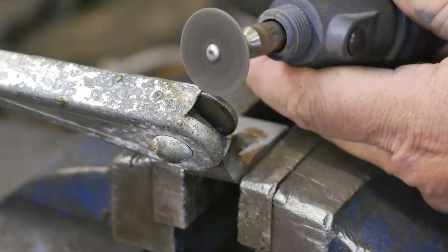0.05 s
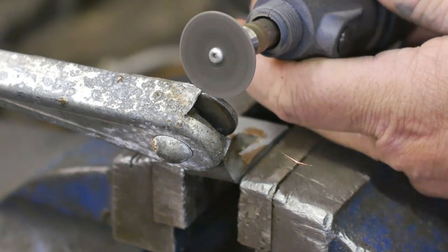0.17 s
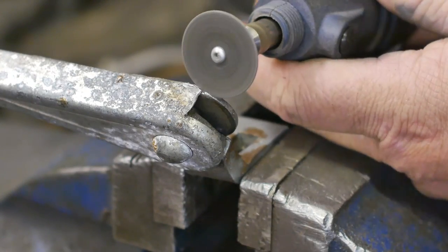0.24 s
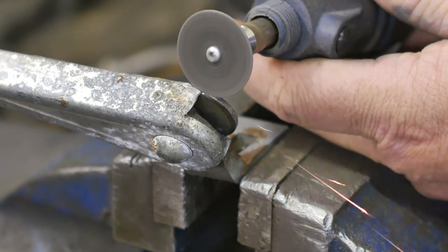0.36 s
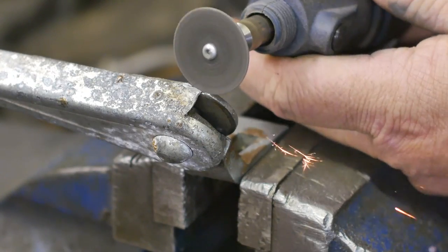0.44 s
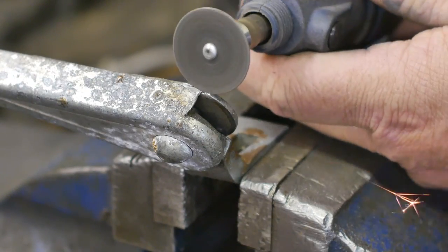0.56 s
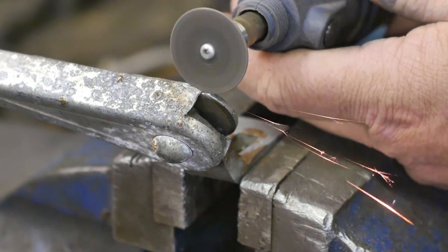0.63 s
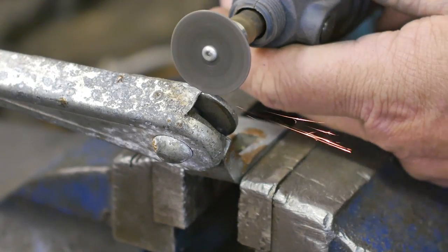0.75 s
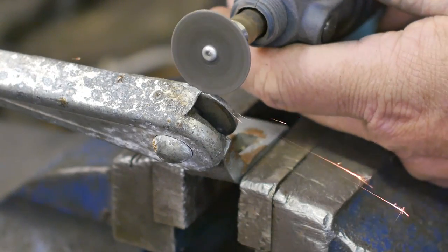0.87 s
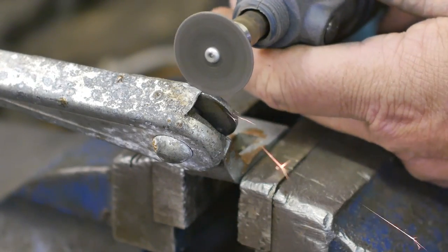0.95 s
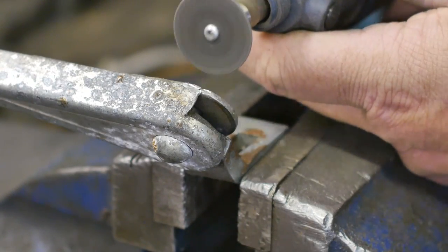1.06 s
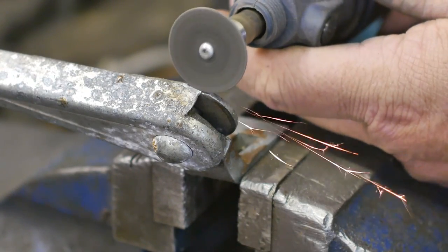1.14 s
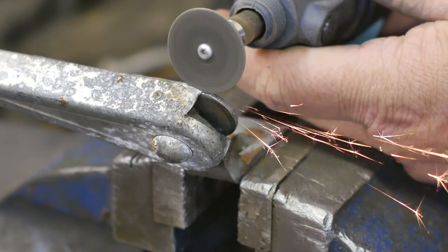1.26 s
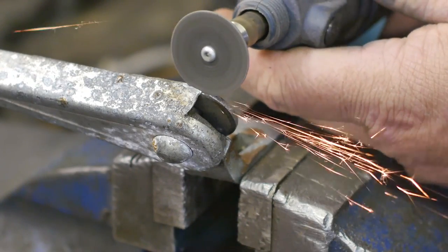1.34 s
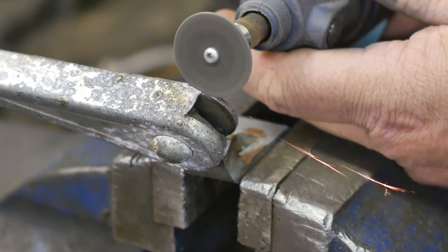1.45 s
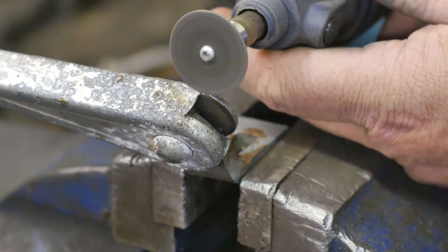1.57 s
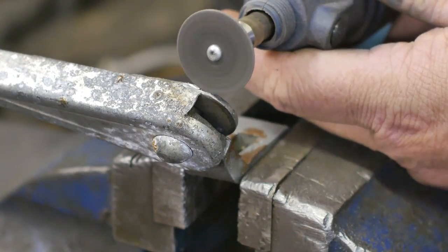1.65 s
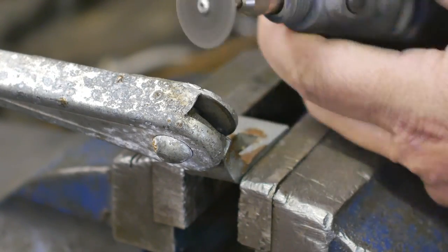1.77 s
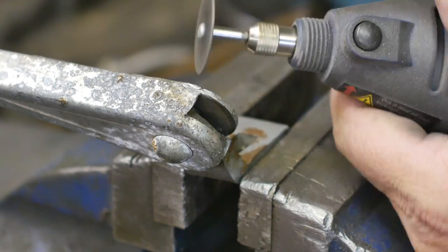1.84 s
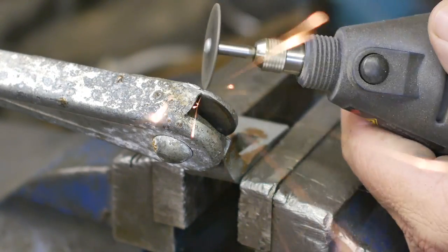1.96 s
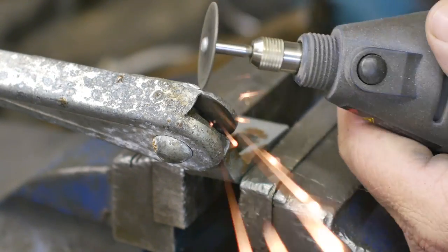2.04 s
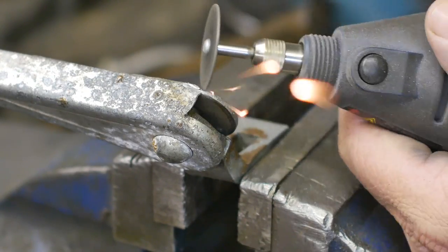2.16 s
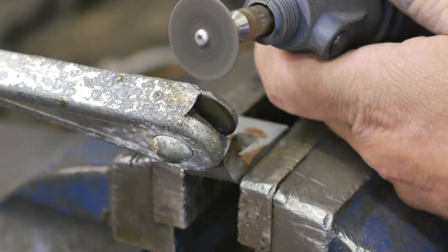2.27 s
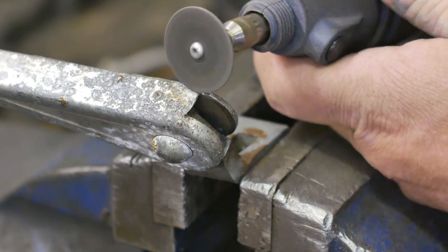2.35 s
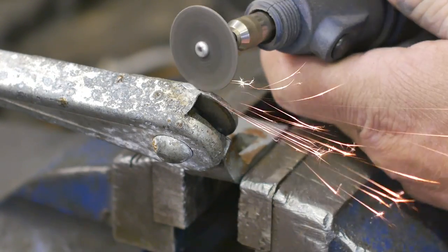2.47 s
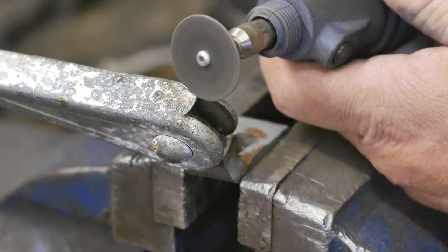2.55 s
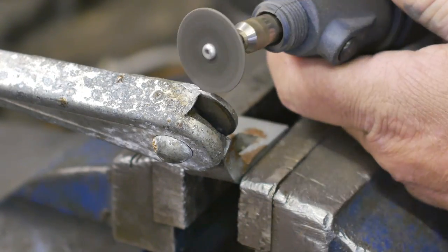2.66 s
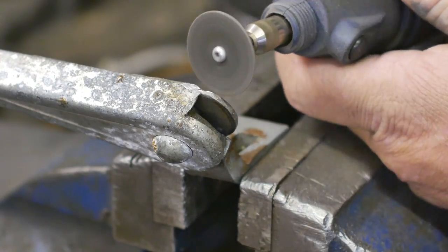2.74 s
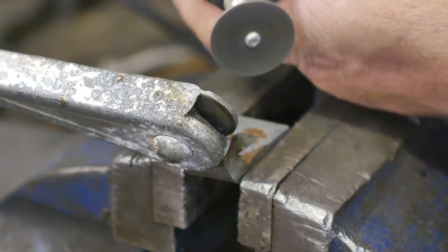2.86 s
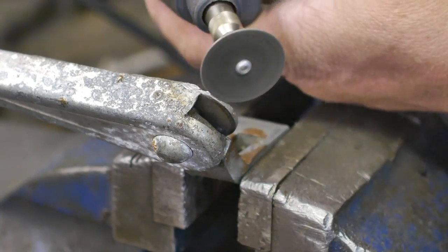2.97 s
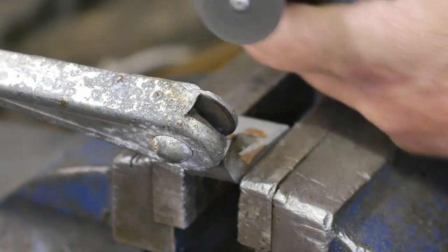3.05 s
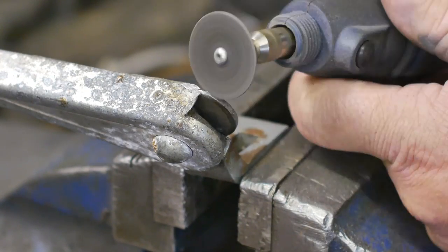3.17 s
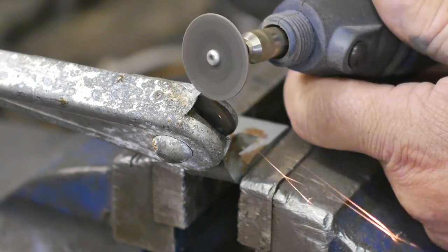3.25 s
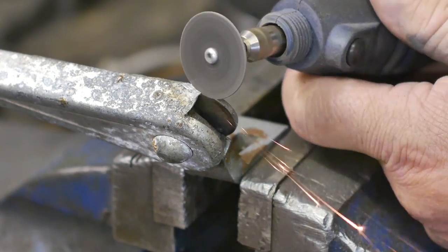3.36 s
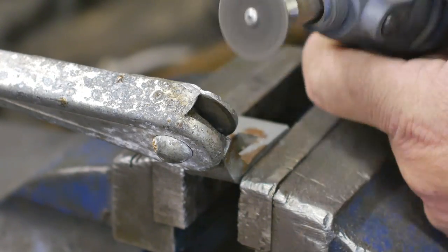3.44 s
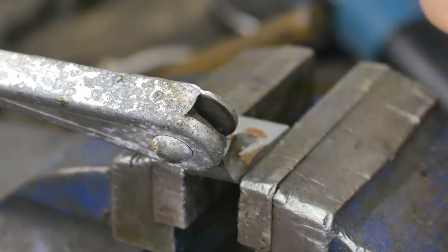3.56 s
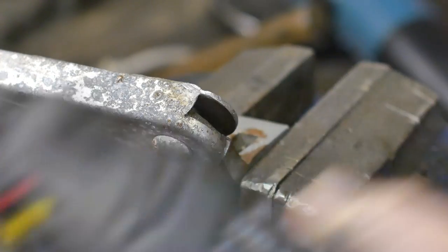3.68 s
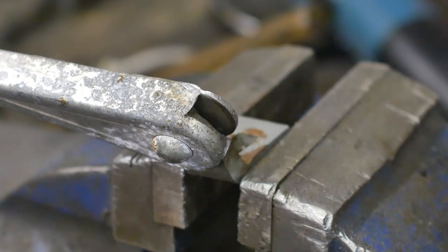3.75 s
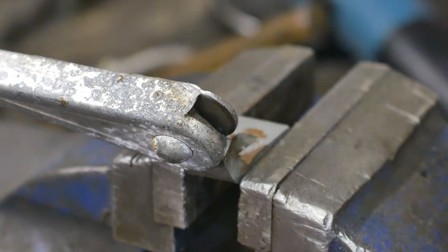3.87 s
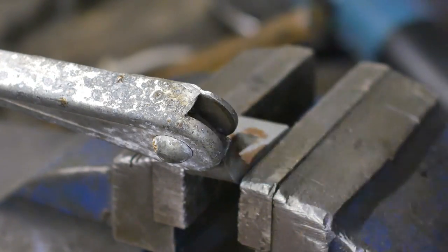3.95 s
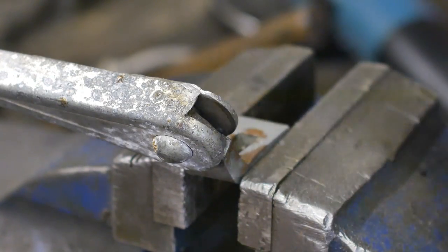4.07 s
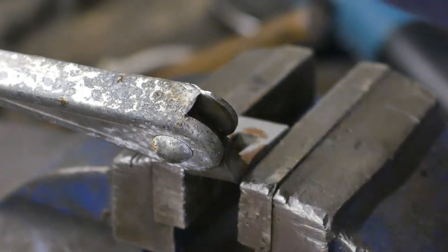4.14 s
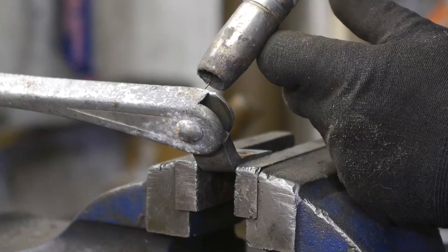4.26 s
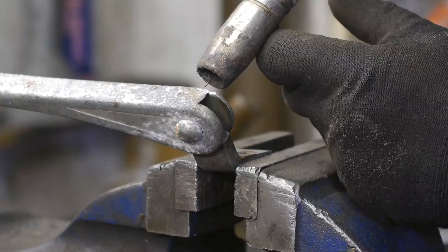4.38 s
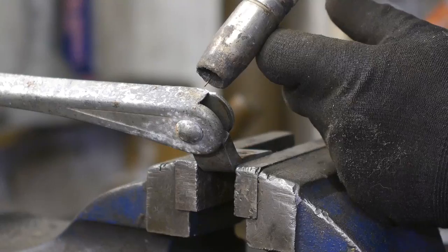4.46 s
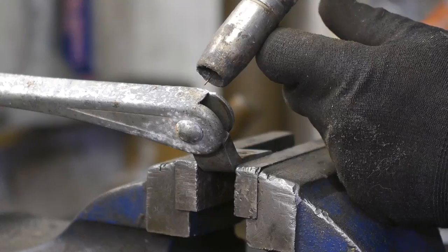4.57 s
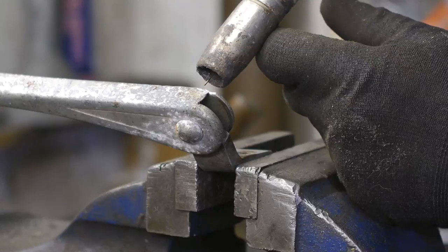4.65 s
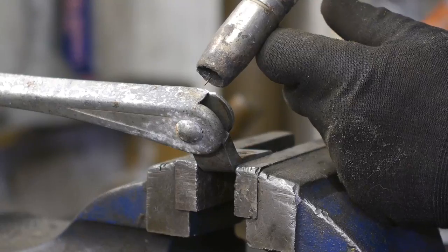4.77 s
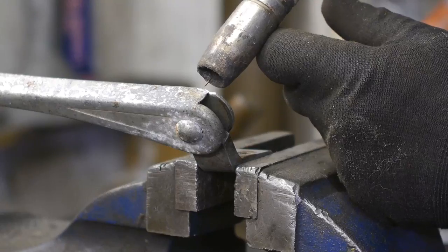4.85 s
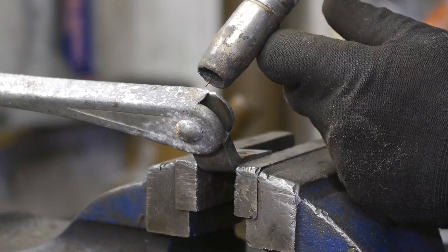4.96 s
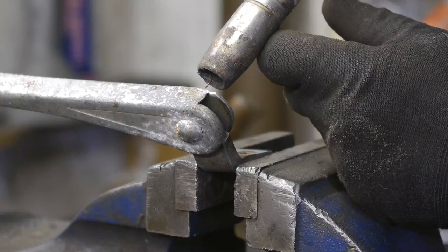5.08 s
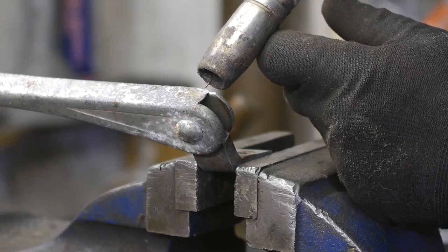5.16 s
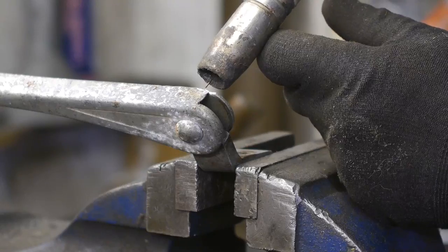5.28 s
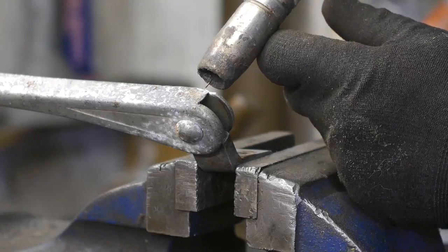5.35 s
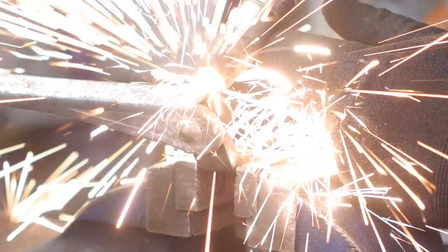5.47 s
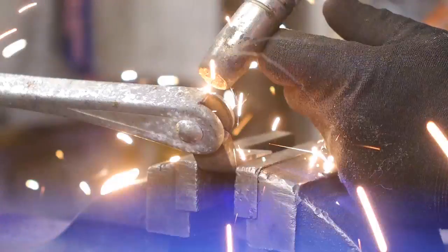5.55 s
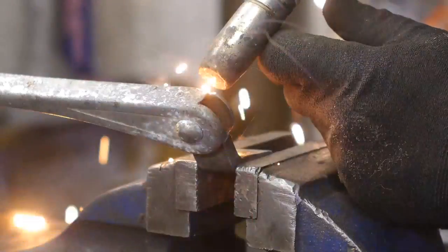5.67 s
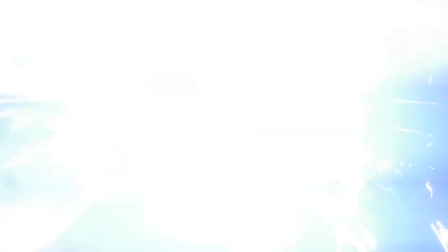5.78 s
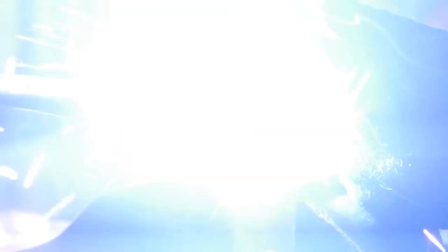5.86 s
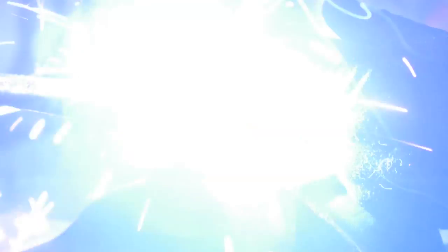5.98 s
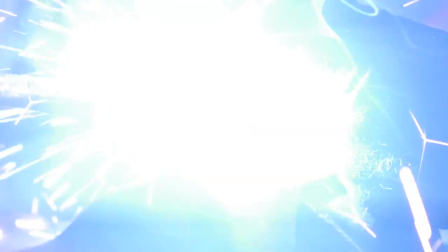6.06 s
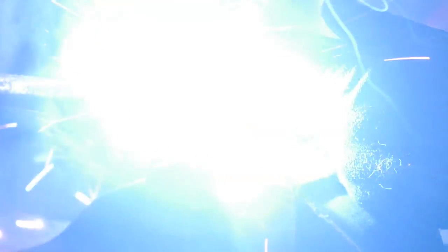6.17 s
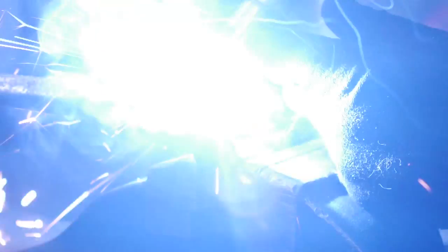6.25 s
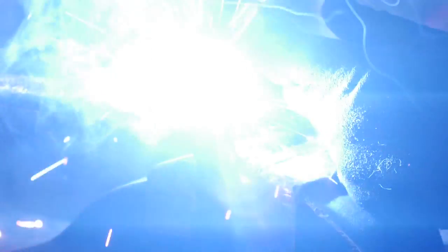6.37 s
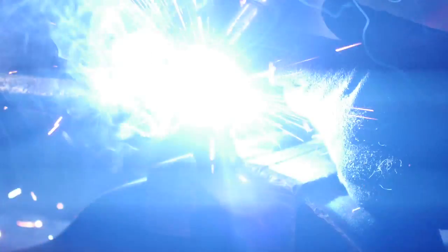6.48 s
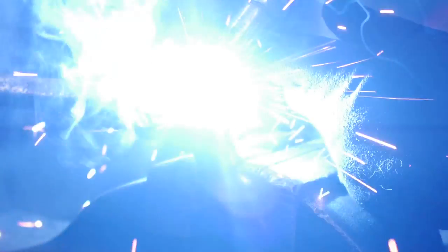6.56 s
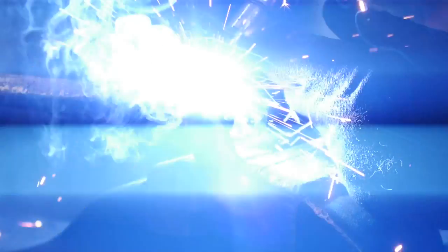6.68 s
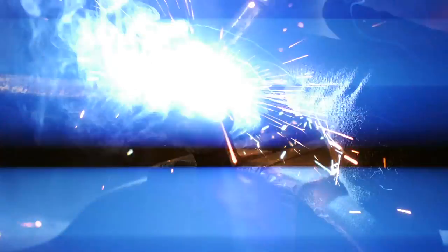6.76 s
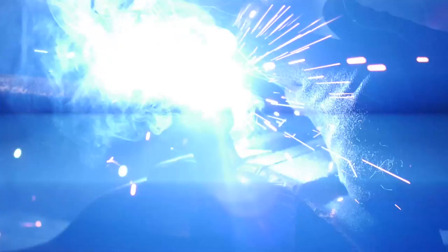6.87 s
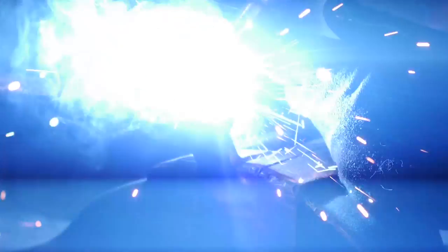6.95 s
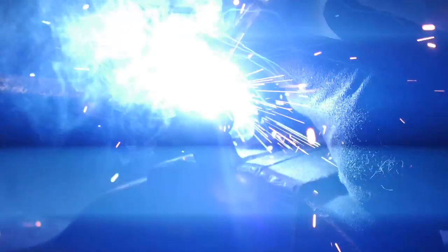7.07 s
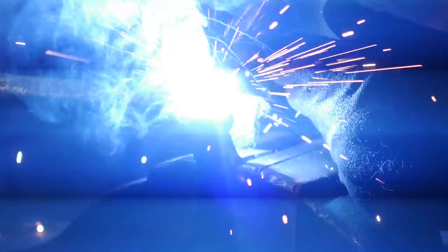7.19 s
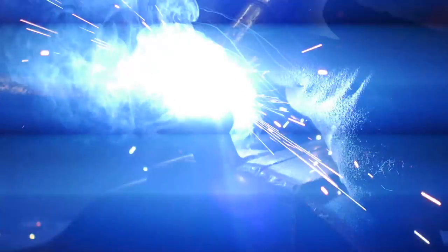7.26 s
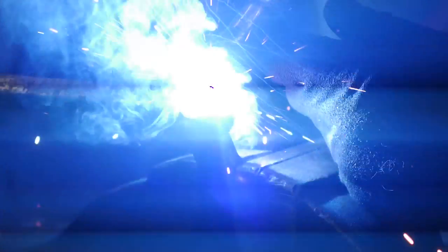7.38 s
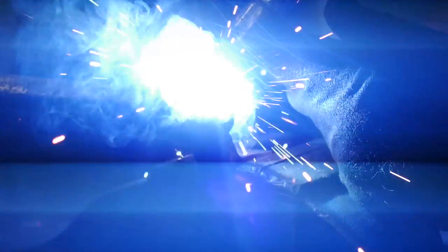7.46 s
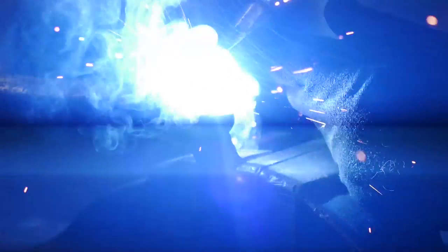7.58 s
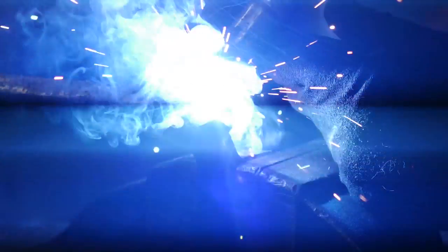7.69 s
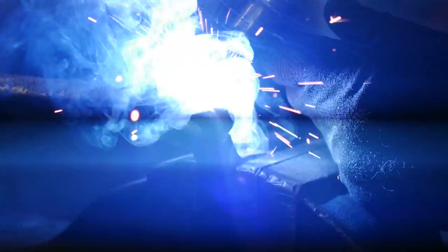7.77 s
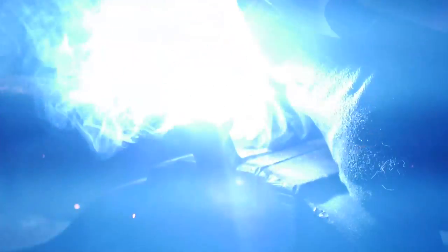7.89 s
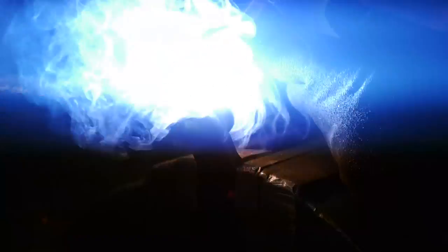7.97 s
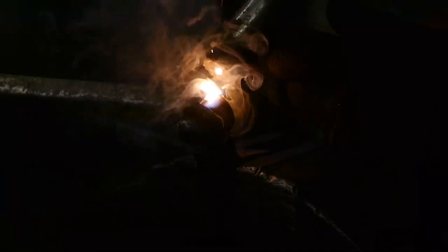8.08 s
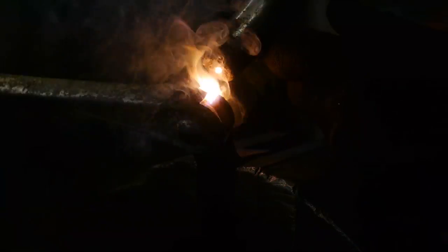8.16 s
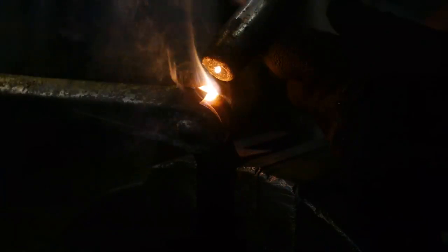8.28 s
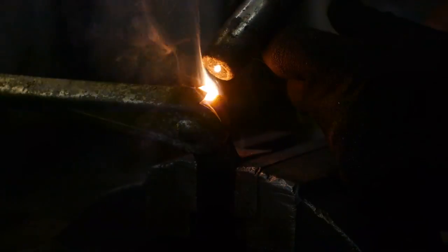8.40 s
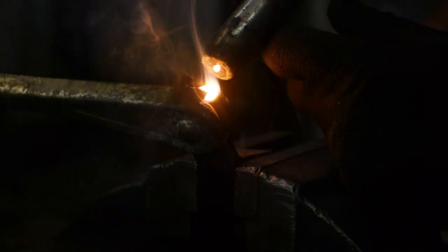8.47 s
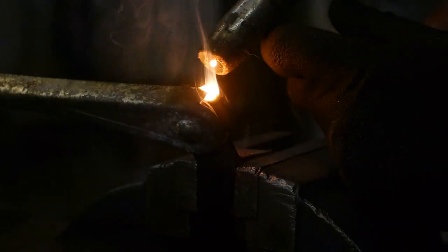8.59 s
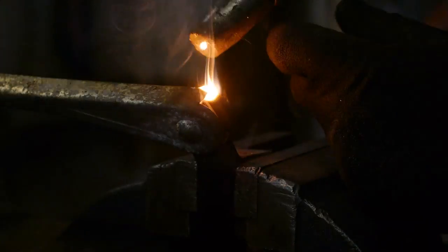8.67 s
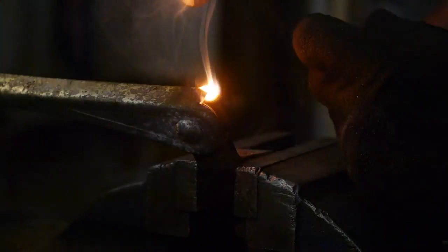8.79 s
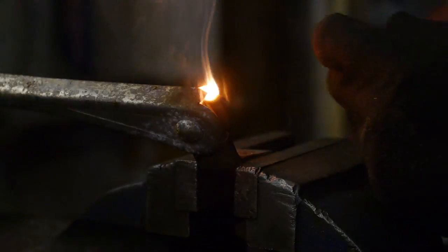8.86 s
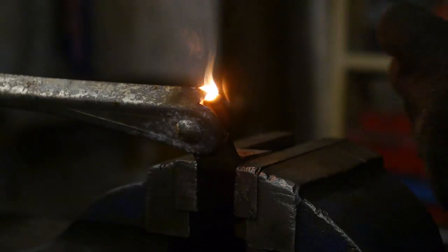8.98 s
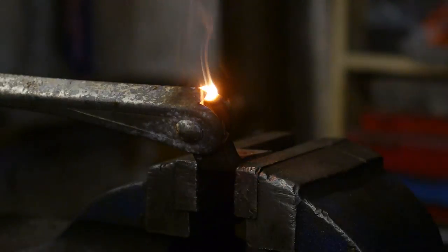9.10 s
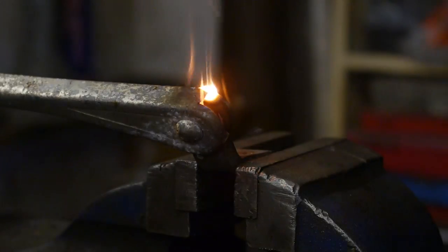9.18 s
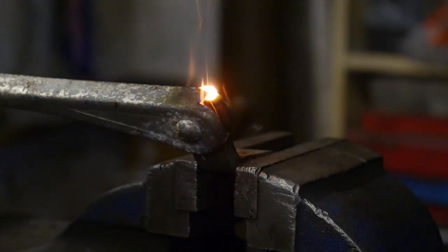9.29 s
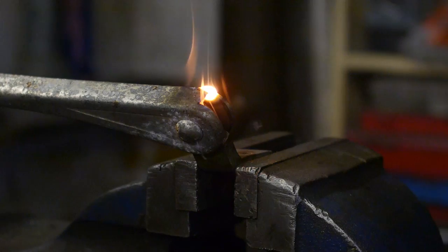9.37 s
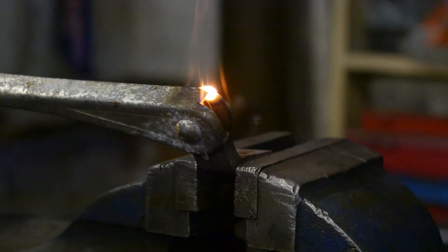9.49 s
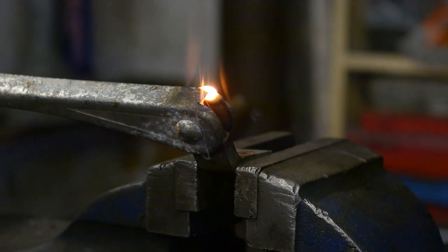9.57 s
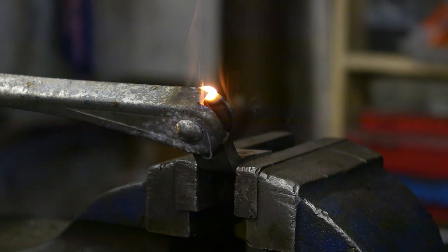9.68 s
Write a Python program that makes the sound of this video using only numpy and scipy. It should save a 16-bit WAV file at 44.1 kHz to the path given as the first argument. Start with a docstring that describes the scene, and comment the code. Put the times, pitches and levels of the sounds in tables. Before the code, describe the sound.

From the start, a small rotary tool whines close by in a workshop, its pitch dipping and recovering as a thin cutting disc bites into steel with repeated rasps and brief squeals. At about 3.6 seconds it switches off and quickly winds down with a slight rattle. A few dry handling knocks and clicks follow between 3.8 and 4.2 seconds, then quiet room air. At 5.3 seconds a wire-feed welder clunks on, its metal cabinet booming, with a low hum and faint feed whirr. The wire pops sharply several times from 5.5 seconds. At 5.8 seconds the arc catches and becomes a fast, buzzing crackle, louder than the grinding, easing slightly before ending with a pop near 8 seconds. The welder clunks off just afterward and the hum dies. From 9 seconds a faint, soft rush swells and ebbs, with one light knock at 9.5 seconds.

```python
"""A rotary tool grinds a crack in a steel part clean, in a vice in a small workshop. Its spindle whines and
slows as the thin cutting disc bites, rasps and squeals; it is switched off and handled. Then a wire-feed
welder clunks on, the wire pops a few times, and the arc settles into a fast crackle of short circuits
over the transformer hum. The welder clunks off, and a soft rush swells and ebbs in the quiet room."""
import sys
import numpy as np
from scipy import signal
from scipy.fft import rfft, irfft
from scipy.io import wavfile

SR = 44100
rng = np.random.default_rng(int(sys.argv[2]) if len(sys.argv) > 2 else 0)


def int16_out(signal):
    """Quantize to a 16-bit WAV file."""
    q = np.round(np.clip(np.atleast_2d(signal).T, -1, 1) * 32767)
    wavfile.write(sys.argv[1], SR, q.astype(np.int16))


N = 429093
TOOL_OFF_S, TOOL_SILENT_S = 3.618, 3.79
ARC_ON_S, ARC_OFF_S, SHORTS_PER_S = 5.825, 7.95, 112


# Spindle speed under load. Each row: time in seconds, speed in Hz.
SPINDLE_SPEED = [(0.0, 475.5), (0.05, 487.7), (0.12, 449.7), (0.22, 395.1), (0.28, 444.8), (0.34, 468.3),
                 (0.41, 452.2), (0.5, 402.0), (0.56, 451.7), (0.61, 471.8), (0.68, 425.3), (0.76, 390.1),
                 (0.86, 378.0), (0.95, 405.0), (1.08, 432.0), (1.19, 465.0), (1.28, 415.2), (1.39, 360.1),
                 (1.47, 400.1), (1.6, 428.0), (1.72, 448.6), (1.79, 439.1), (1.89, 465.0), (2.0, 425.0),
                 (2.12, 400.0), (2.22, 415.2), (2.32, 445.2), (2.41, 451.9), (2.5, 415.0), (2.63, 392.0),
                 (2.75, 412.0), (2.85, 448.0), (2.94, 462.0), (3.07, 428.0), (3.16, 447.8), (3.24, 450.8),
                 (3.33, 391.7), (3.4, 407.8), (3.49, 384.6), (3.55, 430.6), (3.61, 451.5)]
# Brush and fan noise. Each row: frequency in Hz, density in dB.
MOTOR_SPECTRUM = [(100, -26), (200, -17.5), (310, -3.5), (450, 2.5), (620, -1.5), (850, -2), (1300, 1.5),
                  (2200, -1.5), (2600, -5), (3700, -0.5), (4800, -11), (8000, -10.5), (11000, -17),
                  (15500, -35)]

def rotary_tool(free_hz=484, coast_hz_per_s=2400, rush_db_per_hz=.02):
    """The spindle whines over brush and fan noise, drives the disc, and coasts once switched off."""
    t = seconds()
    coast_s = np.maximum(t - TOOL_OFF_S, 0)
    unpowered = np.minimum(coast_s / .04, 1)
    speed_hz = np.maximum(np.interp(t, *np.transpose(SPINDLE_SPEED)) - coast_hz_per_s * coast_s, 0)
    angle = 2 * np.pi * np.cumsum(speed_hz * (1 + .008 * drift(140))) / SR
    rush_db = -36.5 - rush_db_per_hz * (free_hz - speed_hz) - 13.5 * unpowered
    tones = spindle_tone(angle, speed_hz, unpowered) + motor_whine(angle, speed_hz, unpowered, rush_db + 5)
    chopped = white() * (1 + np.cos(angle)) * amp(1.73 * drift(150))
    rush = amp(rush_db) * colour(chopped, MOTOR_SPECTRUM)
    disc = grinding(angle) + squeals(angle)
    room = reverb(amp(-12) * tones + amp(-6) * rush + amp(-8) * disc)
    fade = between(0, TOOL_SILENT_S) * np.clip((TOOL_SILENT_S - t) / .044, 0, 1) ** 2
    return (tones + rush + disc + room + coasting_rattle()) * fade


# Each row: centre in seconds, half length in seconds, fundamental gain in dB, third harmonic gain in dB.
TONE_SWELLS_AND_DIPS = [(0.02, 0.06, 1.5, 10), (0.184, 0.049, -3, -6), (0.28, .035, 1.5, 6.5),
                        (0.367, 0.025, -2, 5), (0.577, 0.045, 2, 2.5), (.82, 0.092, -3, 0),
                        (1.032, 0.034, -4, -1), (1.17, 0.045, -1, 2.5), (1.37, 0.061, -6.5, -2.5),
                        (1.48, 0.039, 1.5, 1.5), (1.868, 0.052, -0.5, 10), (1.979, 0.059, -4, 2),
                        (2.286, 0.025, 2, 7), (2.95, 0.072, -10, 0), (3.157, 0.043, 0.5, 6.5),
                        (3.32, 0.03, -10.5, -4), (3.43, 0.061, -0.5, -5), (3.582, 0.038, 1, 7.5)]

def spindle_tone(angle, speed_hz, unpowered, knee_hz=391, loss_db_per_hz=.54, housing_hz=1357):
    """Unbalance tone: fades as the tool bogs down; its third harmonic glides into a housing resonance."""
    first_db = -32.5 - np.clip(loss_db_per_hz * (knee_hz - speed_hz), 0, 11.5)
    third_db = -47 + 13.5 * resonance(3 * speed_hz, housing_hz, width_hz=240)
    for centre, half, first_gain_db, third_gain_db in TONE_SWELLS_AND_DIPS:
        first_db += first_gain_db * swell(centre, half)
        third_db += third_gain_db * swell(centre, half)
    tone = sum(amp(db + 1.5 * drift(40)) * harmonic(multiple, angle, speed_hz)
               for multiple, db in [(1, first_db), (3, third_db)])
    return tone * amp(-6 * unpowered) * np.minimum(speed_hz / knee_hz, 1) ** 2


# Each row: multiple of spindle speed, relative level in dB, boost when coasting in dB.
WHINE_HARMONICS = [(2, -24, 0), (4, -14.5, 0), (5, -12, 0), (6, -15, 0), (7, -16, 0), (8, -10, 10),
                   (9, -14, 0), (16, -23, 19), (24, -36, 24), (32, -40, 29)]

def motor_whine(angle, speed_hz, unpowered, level_db):
    """Commutator whine, roughened by shake in the bearings; it stands out once the power is off."""
    shake_rad = (.09 - .045 * unpowered) * drift(400)
    whine = 0
    for multiple, db, coast_db in WHINE_HARMONICS:
        flicker_db = 3.5 * drift(60) - .5
        gain = amp(level_db + db + coast_db * unpowered + flicker_db)
        whine += gain * harmonic(multiple, angle + shake_rad, speed_hz)
    return whine


def harmonic(multiple, angle, speed_hz, slips_per_s=90, slip_s=.02, scatter_rad=1.35):
    """One spindle harmonic; crossfaded phase slips make it flutter."""
    step, part = np.divmod(seconds() * slips_per_s, 1)
    step = step.astype(int)
    step_hz = np.interp(np.arange(step[-1] + 2) / slips_per_s, seconds(), speed_hz)
    slips_rad = 2 * np.pi * multiple * step_hz * slip_s + scatter_rad * rng.standard_normal(len(step_hz))
    phasor = np.exp(1j * np.cumsum(slips_rad))
    blend = np.sin(np.pi / 2 * part) ** 2
    return np.imag(np.exp(1j * multiple * angle) * ((1 - blend) * phasor[step] + blend * phasor[step + 1]))


# Disc pressed on steel. Each row: start in seconds, end in seconds, level in dB.
DISC_CUTS = [(0.043, 0.103, -41.5), (0.105, 0.165, -38), (0.175, 0.205, -42), (0.207, 0.24, -37),
             (0.311, 0.325, -40), (0.37, 0.393, -40.5), (.422, .44, -38), (0.455, 0.478, -36),
             (0.5, 0.53, -39), (0.605, 0.78, -38), (0.777, 0.96, -35.5), (0.965, 1.016, -38.5),
             (1.024, 1.084, -43.5), (1.185, 1.41, -35.5), (1.41, 1.478, -39.5), (1.492, 1.51, -37.5),
             (1.518, 1.674, -45), (1.715, 1.758, -36.5), (1.917, 2.23, -42), (2.397, 2.62, -43),
             (2.63, 2.718, -41), (2.744, 2.766, -35), (2.773, 2.81, -42.5), (2.959, 2.981, -34.5),
             (2.997, 3.01, -35.5), (3.036, 3.078, -37.5), (3.24, 3.338, -36), (3.347, 3.497, -38.5)]
# Each row: frequency in Hz, density in dB.
RASP_SPECTRUM = [(600, -17), (2500, 1.5), (4000, 4.5), (5500, 2.5), (6800, -0.5), (8000, 7), (10000, 3),
                 (12200, 1.5), (14200, 3.5), (16000, -5)]
# Modes of disc and steel. Each row: frequency in Hz, width in Hz, gain in dB.
DISC_MODES = [(4980, 120, 5), (6290, 90, 6), (7990, 90, 4), (8630, 90, 4), (9820, 160, 4), (10800, 130, 4),
              (11900, 110, 6)]
# Each row: start and end in seconds, frequency and width in Hz, level and bounce depth in dB.
CUT_RINGS = [(1.942, 2.271, 6700, 350, -49.5, 5), (1.96, 2.26, 6370, 90, -54, 7),
             (1.96, 2.26, 7930, 100, -55, 3.5), (2.52, 2.726, 5000, 190, -44.5, 6.5),
             (2.81, 3.02, 1770, 110, -43, 0.5), (2.895, 2.975, 1500, 110, -37, 1),
             (2.91, 2.98, 3600, 90, -42.5, 1), (3.11, 3.26, 1765, 110, -43.5, 2.5)]

def grinding(angle, bounces_per_s=62, free_hiss_db=-57):
    """The disc rubs hardest once a turn and bounces; its grains tear at the steel and set it ringing."""
    chatter_db, grit_db = 1.3 * drift(90), 2.7 * drift(1800)
    contact = rms_one(np.exp(.25 * np.cos(angle)) * amp(chatter_db + grit_db))
    bounce = np.sin(2 * np.pi * bounces_per_s * seconds() + 2.4 * drift(25))
    pressure = sum(amp(db) * bite(start, end) for start, end, db in DISC_CUTS)
    pressure *= amp(2.6 * bounce + 1.7 * drift(55))
    rasp = colour(white() * contact * np.hypot(pressure, amp(free_hiss_db)), RASP_SPECTRUM, DISC_MODES)
    rings = sum(amp(db + depth_db * bounce) * between(start, end) * noise(hz - width / 2, hz + width / 2)
                for start, end, hz, width, db, depth_db in CUT_RINGS)
    return rasp + rings


# Each row: start in seconds, end in seconds, multiple of spindle speed, level in dB.
DISC_SQUEALS = [(.03, .68, 5, -45), (0.74, .95, 8, -41), (1.31, 1.44, 8, -39), (2.01, 2.234, 5, -41),
                (2.45, 3.25, 16, -51), (3.36, 3.51, 16, -46)]

def squeals(angle, smear_rad=1.3):
    """The disc sticks and slips unevenly in the cut, which smears its squeal into a screech."""
    return sum(amp(db + 2 * drift(55)) * bite(start, end) * np.sin(multiple * angle + smear_rad * drift(400))
               for start, end, multiple, db in DISC_SQUEALS)


def bite(start_s, end_s, rise_s=.016, lift_s=.014):
    """Pressure builds as the disc meets the steel and ebbs as it lifts."""
    t = seconds()
    return np.clip((t - start_s) / rise_s, 0, 1) * np.exp(-np.clip((t - end_s) / lift_s, 0, 20))


def coasting_rattle(delay_s=.052, rise_s=.052):
    """Brushes and bearings rattle as the spindle runs down."""
    rattle = amp(-49) * noise(3100, 4800) + amp(-54) * noise(6100, 9200)
    return rattle * amp(2 * drift(120)) * np.clip((seconds() - TOOL_OFF_S - delay_s) / rise_s, 0, 1)


# Arc flares and falters. Each row: centre in seconds, half length in seconds, gain in dB, treble in dB.
ARC_FLARES = [(5.87, 0.034, 4, -6.5), (5.997, 0.046, 6, -8), (6.103, 0.007, -18, 2), (6.158, 0.014, 1, -2),
              (6.3, .009, -5, 1), (6.305, 0.009, 4.5, 2), (6.828, 0.087, 1.5, -6)]

def arc(fade_db_per_s=2, jitter=.17):
    """The wire shorts to the pool and each re-ignition snaps; the arc calms as the pool heats up."""
    level_db = -7.5 - fade_db_per_s * since(ARC_ON_S) - .22 * drift(15)
    level_db += sum(db * swell(centre, half) for centre, half, db, _ in ARC_FLARES)
    treble_db = 4 + sum(db * swell(centre, half) for centre, half, _, db in ARC_FLARES)
    gaps, sizes = rng.standard_normal((2, 400))
    times_s = ARC_ON_S + np.cumsum(np.exp(jitter * gaps)) / SHORTS_PER_S
    spread_db = -.25 * gaps - .37 * sizes
    burning = times_s < ARC_OFF_S
    at = (times_s[burning] * SR).astype(int)
    snaps = np.zeros(N)
    snaps[at] = -amp(level_db[at] + spread_db[burning])
    sizzle = amp(level_db - 28 + 4.52 * drift(600)) * white() * between(ARC_ON_S, ARC_OFF_S)
    source = snaps + sizzle
    dull = signal.lfilter([.5], [1, -.5], source)
    crackle = nozzle(dull + (source - dull) * amp(treble_db))
    pops = wire_pops()
    room = reverb(amp(-2.5) * crackle + amp(-6) * pops)
    return crackle + pops + room + amp(-38) * cabinet_boom(crackle)


# One short circuit. Each row: frequency in Hz, density in dB.
SNAP_SPECTRUM = [(25, -27.5), (85, -6), (320, 7), (440, 4), (700, 7), (1300, 3), (1850, 1.5), (2300, 0.5),
                 (3800, 3), (5400, -2.5), (5900, -2), (8800, 3.5), (12500, -0.5), (15500, -10.5)]
# Modes of nozzle, work and vice. Each row: frequency in Hz, width in Hz, gain in dB.
NOZZLE_MODES = [(656, 62, 4.5), (856, 43, 4.5), (1062, 56, 6), (1290, 160, 10), (1564, 45, 7),
                (1759, 130, 12), (3290, 95, 3.5), (3714, 170, 5.5), (4170, 250, 6.5), (5280, 320, 10),
                (5800, 530, -7.5), (9240, 350, 4), (9910, 700, -11), (13500, 1300, -5)]

def nozzle(x, trip_s=.00039, rebound=.87):
    """Snaps bounce between nozzle and work, and ring higher or lower as the arc length changes."""
    loop = np.r_[1, np.zeros(round(trip_s * SR) - 1), -rebound]
    bounced = signal.lfilter(-loop[::-1], loop, x)
    high_share = np.clip(.5 + drift(SHORTS_PER_S), 0, 1)
    ring = 0
    for detune, share in [(1.01206, high_share), (.99136, 1 - high_share)]:
        modes = [(hz * detune, width, db) for hz, width, db in NOZZLE_MODES]
        ring += colour(bounced * share, SNAP_SPECTRUM, modes)
    return ring


# Each row: start in seconds, blast level in dB, spatter level in dB, spatter T60 in seconds.
WIRE_POPS = [(5.4837, -13, -17, .043), (5.4853, -13.5, -20, .043), (5.5363, -8.5, -16, .067),
             (5.651, -26, -20, .084), (5.7013, -9, -19.5, 0.092), (5.8136, -9, -18.5, 0.037),
             (5.8218, -12.5, -25.5, .032), (6.1123, -14.5, -36, .027), (6.1735, -15, -29, 0.0404),
             (6.302, -16, -39, .03), (7.951, -14, -22, .025)]
# Each row: frequency in Hz, density in dB.
POP_SPECTRUM = [(50, -14.5), (150, 0.5), (320, 2.5), (700, 4), (1000, 1.5), (1800, 5), (2400, -5.5),
                (3900, 5), (6000, -4), (8800, 2), (12500, -7), (15500, -12.5)]

def wire_pops(blast_t60_s=.0092):
    """The wire sticks, overheats and bursts: a brief blast, then a spray of molten drops."""
    envelope = sum(amp(blast_db) * burst(s, blast_t60_s, rise_s=.00005) + amp(spatter_db) * burst(s, t60)
                   for s, blast_db, spatter_db, t60 in WIRE_POPS)
    return colour(envelope * white(), POP_SPECTRUM)


# Low modes of cabinet and room. Each row: frequency in Hz, level in dB, T60 in seconds.
CABINET_MODES = [(164.4, -6, 0.21), (212.5, -4, .28), (176, -32.5, 2.1), (322.3, -7.5, .11),
                 (302.5, -32.5, 1.3)]

def cabinet_boom(x):
    """Sound rings the low modes of cabinet and room."""
    ring = 0
    for hz, db, t60 in CABINET_MODES:
        radius, step_rad = np.exp(-np.log(1000) / (t60 * SR)), 2 * np.pi * hz / SR
        poles = [1, -2 * radius * np.cos(step_rad), radius ** 2]
        ring += amp(db) * signal.lfilter([.5, 0, -.5], poles, x + 1e-18)
    return band(ring, 160, 600)


# Switch-on, then switch-off. Each row: start in seconds, clack level in dB, low and top edge in Hz,
# boom level in dB, boom delay and rise in seconds, ring time factor.
CONTACTOR_HITS = [(5.317, -26, 220, 12960, -14, .009, .028, 1.2),
                  (8.142, -23, 593, 4070, -15, .003, 0.014, .68)]
# Each row: frequency in Hz, density in dB.
CLACK_SPECTRUM = [(210, -36), (350, -4.5), (721, -9), (805, -4), (1020, -12), (1420, -4), (2200, -12.5),
                  (2790, -9.5), (3210, -12.5), (6030, -9.5), (8380, -8.5), (11100, -8.5), (15000, -28)]

def contactor(clack_t60_s=.24):
    """The contactor clacks and shakes the sheet cabinet, whose loose panels shudder."""
    clack, shake = 0, 0
    for s, clack_db, low_hz, top_hz, boom_db, delay_s, rise_s, ring_factor in CONTACTOR_HITS:
        impact = band(colour(white(), CLACK_SPECTRUM), low_hz, top_hz)
        clack += amp(clack_db) * burst(s, clack_t60_s, rise_s=.003) * impact
        for hz, db, t60 in CABINET_MODES:
            shudder = amp(2.5 * drift(45)) * np.sin(2 * np.pi * hz * (seconds() - s) + drift(70))
            shake += amp(boom_db + db) * burst(s + delay_s, t60 * ring_factor, rise_s) * shudder
    return clack + amp(-7.5) * reverb(clack) + shake


# Each row: frequency in Hz, level in dB.
HUM_LINES = [(172, -57.5), (200, -65), (302, -47), (400, -64.5), (500, -64), (600, -67.5), (700, -64.5),
             (800, -68.5), (900, -68.5), (1300, -63), (1600, -66), (1700, -68.5)]
# Each row: frequency in Hz, density in dB.
FEED_SPECTRUM = [(240, -37), (400, -0.5), (1160, -4), (1290, 4), (1410, -11), (1770, -1), (2150, -24),
                 (3660, -12.5), (15000, -29)]

def transformer_and_feed(surge_db=15.5, surge_s=.14, load_db=-2, release_t60_s=.3):
    """Transformer hum and wire-feed whirr surge at switch-on, dip under the arc and die at switch-off."""
    on_s, off_s = (row[0] for row in CONTACTOR_HITS)
    level_db = -2 + surge_db * np.exp(-since(on_s) / surge_s) + load_db * between(ARC_ON_S, ARC_OFF_S)
    gate = between(on_s, np.inf) * amp(-60 * since(off_s) / release_t60_s)
    hum = sum(amp(db) * np.sin(2 * np.pi * hz * seconds() + rng.uniform(0, 2 * np.pi))
              for hz, db in HUM_LINES)
    whirr = amp(-55) * colour(white(), FEED_SPECTRUM)
    return amp(level_db) * gate * (hum + whirr)


# Each row: start in seconds, thud, body and edge levels in dB, T60 in seconds.
TOOL_KNOCKS = [(3.802, -80, -54, -80, 0.068), (3.822, -41, -51, -80, .05), (3.831, -29, -24, -37, 0.018),
               (3.84, -45, -53, -70, 0.043), (3.966, -68, -49, -35.5, 0.031),
               (3.974, -47, -53, -32.5, 0.013), (4.022, -55, -57, -76, 0.054), (4.056, -53, -49, -67, .043),
               (4.071, -48, -37, -65, 0.027), (4.2, -81, -70, -61.5, 0.099),
               (9.502, -47.5, -60, -68, 0.036)]

def handling(rustle_s=(3.77, 4.14)):
    """Handled tools give dry knocks and clicks over a soft rustle."""
    thud, body, edge = noise(70, 370), noise(400, 1960), noise(2800, 7300)
    rustle = amp(-71.5 + 3.3 * drift(60)) * between(*rustle_s) * noise(300, 4800)
    knocks = 0
    for s, thud_db, body_db, edge_db, t60 in TOOL_KNOCKS:
        impact = amp(thud_db) * thud + amp(body_db) * body + amp(edge_db) * edge
        knocks += burst(s, t60, rise_s=.0014) * impact
    return rustle + knocks


# Each row: frequency in Hz, T60 in seconds.
ROOM_DECAY = [(200, .36), (1000, .3), (4000, .25), (9000, .21), (15000, .15)]

def reverb(x, onset_s=.0034, side_db=-17):
    """Dense reflections from bench and walls, the treble dying first; nearly alike in both ears."""
    age_s = np.arange(SR // 2) / SR
    hz = np.fft.rfftfreq(len(age_s), 1 / SR)
    edges_hz = np.geomspace(240, SR / 2, 14)
    spectra, tail = rfft(rng.standard_normal((2, len(age_s)))), 0
    onset = np.clip(age_s / onset_s - .5, 0, 1)
    for low, high in zip(edges_hz, edges_hz[1:]):
        decay = amp(-60 * age_s / at_hz(ROOM_DECAY, np.sqrt(low * high)))
        part = irfft(spectra * (hz >= low) * (hz < high), len(age_s)) * decay * onset
        tail += part * np.sqrt((high - low) / (SR / 2) / np.sum(part ** 2, axis=1, keepdims=True))
    mid, side = signal.oaconvolve(x[None], tail, axes=1)[:, :N]
    return mid + amp(side_db) * side * np.array([[1], [-1]])


# Each row: frequency in Hz, density in dB.
AIR_SPECTRUM = [(15, -14.5), (30, -5.5), (60, -13.5), (110, -6.5), (200, -11), (320, -9.5), (600, -16.5),
                (1500, -23), (4000, -31), (15500, -40.5)]
# Each row: start in seconds, end in seconds, level in dB.
RUMBLE_SPANS = [(3.838, 3.9, -60), (4.23, 4.7, -76.5), (5.326, 5.48, -52), (5.48, 6.15, -61.5),
                (6.15, 8.0, -70)]

def room_tone():
    """Quiet workshop air, a faint hiss and a low rumble."""
    air = amp(-73.5) * wide(lambda: colour(white(), AIR_SPECTRUM), side_db=-16.5)
    hiss = amp(-80.5) * rng.standard_normal((2, N))
    rumble_gain = amp(-79.5) + sum(amp(db) * between(start, end) for start, end, db in RUMBLE_SPANS)
    return air + hiss + rumble_gain * wide(lambda: noise(45, 85), side_db=-21.5)


# Each row: frequency in Hz, density in dB.
RUSH_SPECTRUM = [(30, -7), (80, -5), (211, -3.5), (456, -0.5), (569, -8), (649, -2.5), (1430, -5.5),
                 (1870, -9.5), (4130, -14), (15500, -29.5)]

def soft_rush(start_s=8.96, rise_s=.029, peak_s=9.31, slope_db_per_s=22):
    """A soft rush swells and ebbs after the weld."""
    onset = np.minimum(since(start_s) / rise_s, 1)
    level_db = -60 - slope_db_per_s * np.abs(seconds() - peak_s)
    return onset * amp(level_db) * wide(lambda: colour(white(), RUSH_SPECTRUM), side_db=-20)


def amp(db):
    """Decibels to gain."""
    return 10 ** (np.asarray(db) / 20)


def rms_one(x):
    """Scale to unit rms."""
    return x / np.sqrt(np.mean(x ** 2) + 1e-20)


def seconds():
    """Time of every sample."""
    return np.arange(N) / SR


def since(start_s):
    """Seconds elapsed, zero before the start."""
    return np.maximum(seconds() - start_s, 0)


def between(start_s, end_s):
    """Gate with 10 ms ramps."""
    return np.clip(np.minimum(seconds() - start_s, end_s - seconds()) * 100, 0, 1)


def swell(centre_s, half_s):
    """Smooth bump of height one."""
    return np.exp(-np.minimum(((seconds() - centre_s) / half_s) ** 2, 20))


def burst(start_s, t60_s, rise_s=.0025):
    """Quick rise, exponential decay."""
    age_s = since(start_s)
    return (1 - np.exp(-age_s / rise_s)) * 1000.0 ** -np.minimum(age_s / t60_s, 4)


def white():
    """White noise of unit rms."""
    return rng.standard_normal(N)


def noise(low_hz, high_hz):
    """Band noise of unit rms."""
    return rms_one(band(white(), low_hz, high_hz))


def drift(knots_per_s):
    """Random wander of unit rms."""
    knots = rng.standard_normal(8000)
    return rms_one(np.interp(seconds() * knots_per_s, np.arange(len(knots)), knots))


def wide(source, side_db):
    """Two draws of a noise source, as mid and side."""
    return source() + amp(side_db) * source() * np.array([[1], [-1]])


def at_hz(points, hz):
    """Read a table on a log-frequency axis."""
    points_hz, values = np.transpose(points)
    return np.interp(np.log(hz + 1), np.log(points_hz), values)


def resonance(hz, centre_hz, width_hz):
    """Resonance curve of height one."""
    return 1 / (1 + (2 * (hz - centre_hz) / width_hz) ** 2)


def colour(x, spectrum, modes=(), size=8192):
    """Minimum-phase filter of unit power gain with the given spectrum and modes."""
    hz = np.arange(size // 2 + 1) * SR / size
    gain = amp(at_hz(spectrum, hz) + sum(db * resonance(hz, centre, width) for centre, width, db in modes))
    cepstrum = irfft(np.log(rms_one(gain)))
    cepstrum[1:size // 2] *= 2
    cepstrum[size // 2 + 1:] = 0
    return signal.oaconvolve(x, irfft(np.exp(rfft(cepstrum))))[:N]


def band(x, low_hz, high_hz):
    """Butterworth band-pass."""
    return signal.sosfilt(signal.butter(2, [low_hz, high_hz], "band", fs=SR, output="sos"), x + 1e-18)


def scene():
    """Grinding, handling, then welding, over the workshop background."""
    return rotary_tool() + handling() + arc() + contactor() + transformer_and_feed() + room_tone() + soft_rush()


def record(dry):
    """Soft clip, then a steep low-pass."""
    ceiling, cutoff_hz = .8, 15900
    low_pass = signal.ellip(10, .1, 80, cutoff_hz, fs=SR, output="sos")
    return signal.sosfilt(low_pass, ceiling * np.tanh(dry / ceiling))


dry = scene()
out = record(dry)
int16_out(out)
```